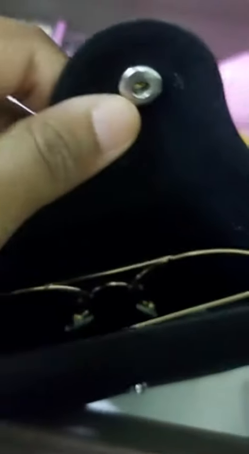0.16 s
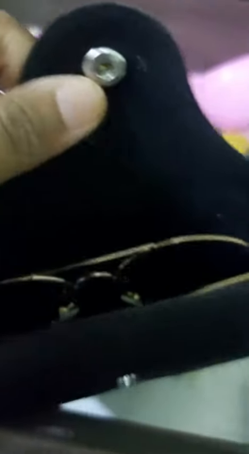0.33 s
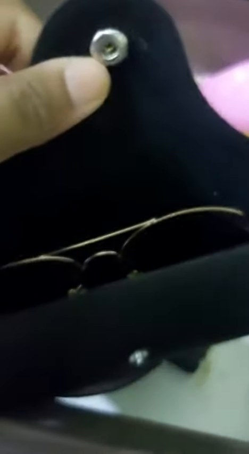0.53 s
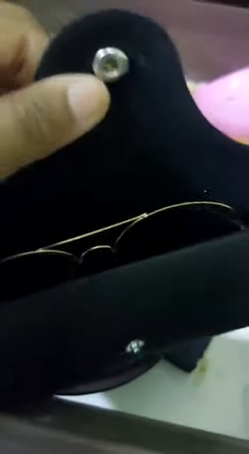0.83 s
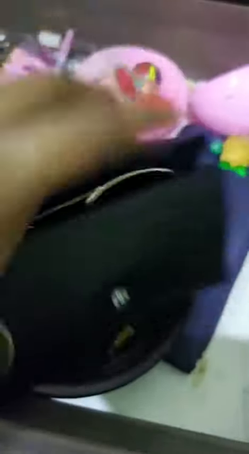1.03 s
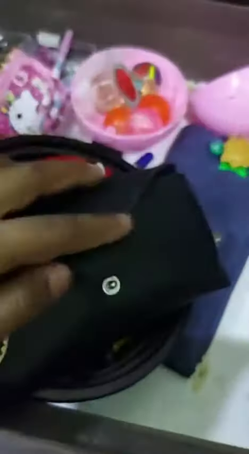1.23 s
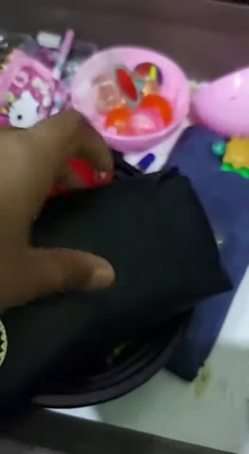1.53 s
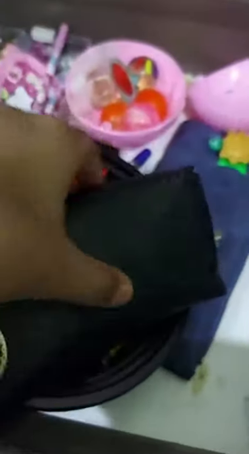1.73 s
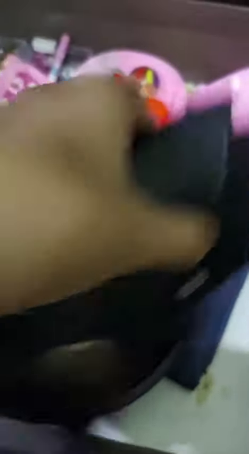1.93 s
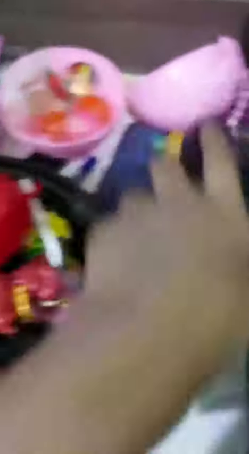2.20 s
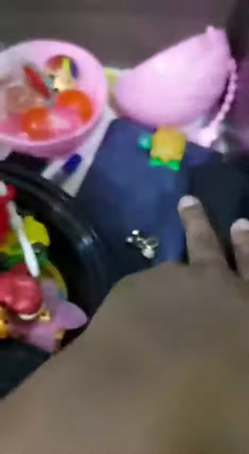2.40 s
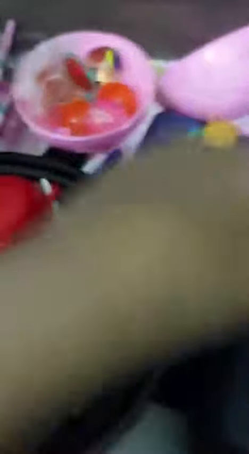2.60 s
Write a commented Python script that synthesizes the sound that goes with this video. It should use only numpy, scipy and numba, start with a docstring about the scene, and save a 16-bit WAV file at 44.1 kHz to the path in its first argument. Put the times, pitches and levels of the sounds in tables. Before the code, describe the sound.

Near-silent low hum first, then a glasses case closes with a sharp metal tick and rustle, a few soft taps follow, and it lands hard on a shelf; close phone microphone, small room, short echo.

```python
"""A hard glasses case is folded shut by hand and set down on a shelf, close to a phone in a small room.
Blows set decaying modes ringing: the hollow shell knocks, the shelf thuds, the metal frames and snap tick.
Fingers rub the cloth cover, made of dense noise grains, and a far machine hums as a few wavering sines.
Shaped noise gives the rumble and hiss; delay lines that feed each other give the echo of the room."""
import sys
import numpy as np
from scipy import signal
from scipy.fft import rfft, irfft
from scipy.io import wavfile
from scipy.ndimage import uniform_filter1d, map_coordinates
from numba import njit

SR = 44100
rng = np.random.default_rng(int(sys.argv[2]) if len(sys.argv) > 2 else 0)


def master(y):
    """Save y as 16-bit WAV."""
    cut = np.clip(np.atleast_2d(y).T, -1, 1)
    pcm = np.round(cut * 32767)  # scale
    wavfile.write(sys.argv[1], SR, pcm.astype(np.int16))


def decibels_to_gain(level_db):
    """Convert a level in decibels to a linear amplitude gain (20 dB per decade)."""
    exponent = np.asarray(level_db, float) / 20
    return 10 ** exponent


N = 121275  # length in samples


def level(x, db):
    """Scale to an rms level in dB."""
    return x * decibels_to_gain(db) / np.sqrt(np.mean(x ** 2))


def band(x, hz, octaves):
    """Band-pass around hz, so many octaves wide."""
    low = hz * 2 ** (-octaves / 2)
    high = min(hz * 2 ** (octaves / 2), .45 * SR)
    return signal.sosfilt(signal.butter(2, [low, high], "bandpass", fs=SR, output="sos"), x)


def walk(rate):
    """Smooth random wander around zero, with about rate new values a second."""
    k = int(SR / rate)
    steps = np.repeat(rng.standard_normal(N // k + 1), k)
    return 0.56 * uniform_filter1d(uniform_filter1d(steps, k), k)[:N]


def shape(table, hz):
    """Read a spectrum table in dB at hz, along a logarithmic pitch scale."""
    table = np.array(table)
    return np.interp(np.log(hz), np.log(table[:, 0]), table[:, 1])


def sides(left_over_right_db):
    """Gains that make the left side louder than the right by so many dB."""
    return decibels_to_gain(np.array([[left_over_right_db], [-left_over_right_db]]) / 2)


# The steady tones of the far machine.
# Each row: pitch in Hz, level in dB, how strongly that level wavers in dB.
HUM_LINES = [(48, -52.5, 4.5), (42.2, -65.5, -11), (94.9, -56, -4.5), (128, -61.5, 1.5)]
# How the higher hum tones swell and fade.
# Each row: time in seconds, change of level in dB.
OVERTONE_SWELL_CURVE = [(0, -14), (.4, -3), (.9, 1), (2.2, 1.5), (2.75, -8)]


def machine_hum():
    """A few sine tones, each wavering in level and slightly in phase, the same left and right."""
    t = np.arange(N) / SR
    swell_db = np.interp(t, *np.array(OVERTONE_SWELL_CURVE).T)
    hum = np.zeros(N)
    for hz, db, waver_db in HUM_LINES:
        line_db = db + waver_db * walk(11) + (hz > 90) * swell_db
        turns = hz * t + .03 * walk(3.9) + rng.random()
        hum += decibels_to_gain(line_db) * np.sqrt(2) * np.sin(2 * np.pi * turns)
    return hum


# The colour of the rumble and microphone hiss.
# Each row: pitch in Hz, relative strength there in dB per Hz.
AIR_SPECTRUM = [(30, -22), (50, -17.5), (70, -28), (90, -5.5), (190, -16.5), (250, -11), (330, -14.5),
                (420, -18.5), (500, -24), (1000, -37.5), (2040, -49), (4000, -59.5), (16500, -72)]


def room_air():
    """Noise shaped into rumble and microphone hiss; the bass is nearly the same left and right."""
    air_db, flicker_db, alike_hz = -53, 0.25, 460  # left and right part ways around alike_hz
    hz = np.maximum(np.fft.rfftfreq(N, 1 / SR), 1)
    colour = decibels_to_gain(shape(AIR_SPECTRUM, hz))
    mid, side = rng.standard_normal((2, N))
    mid = irfft(rfft(mid) * colour, N)
    side = irfft(rfft(side) * colour * np.sqrt(hz / (hz + alike_hz)), N)
    air = (mid + side * np.array([[1], [-1]])) * decibels_to_gain(flicker_db * walk(1.7))
    return level(air, air_db)


# An even treble hiss that grows as the hand moves about.
# Each row: time in seconds, rms level in dB.
HISS_CURVE = [(0, -77.5), (.8, -78.5), (1.0, -70.5), (1.3, -73.5), (1.45, -74), (1.7, -70), (2.101, -73),
              (2.3, -65.5), (2.5, -70.5), (2.75, -66.5)]


def treble_hiss():
    """Smooth band of treble noise, unrelated left and right, following the level curve."""
    noise = band(rng.standard_normal((2, N)), hz=13000, octaves=0.98)
    db = np.interp(np.arange(N) / SR, *np.array(HISS_CURVE).T)
    return level(noise, 0) * decibels_to_gain(db)


# How the fingers move on the cloth.
# Each row: time in seconds, level in dB, treble tilt in dB per octave around 2000 Hz.
RUB_MOVES = [(0, -100, -8), (.85, -95, -7), (.97, -68.5, -4.5), (1.02, -71, -4), (1.11, -63, -6),
             (1.16, -49.5, -5), (1.27, -58, -4), (1.4, -75, -4), (1.5, -61.5, 0), (1.54, -64, -3),
             (1.66, -66, -5), (1.761, -63.5, -5.5), (1.83, -52.5, -3.5), (1.94, -55, -5.5), (2.0, -67, 3),
             (2.12, -74.5, -7.5), (2.221, -63, -3), (2.3, -29, -3), (2.398, -49, -6), (2.5, -63.5, -1.5),
             (2.598, -66, 5), (2.75, -92, 18)]
# The colour of the cloth.
# Each row: pitch in Hz, strength of the grains there in dB.
CLOTH_SPECTRUM = [(400, -4), (800, -2.5), (1700, -2.5), (3400, -4), (6000, -11), (10000, -19.5),
                  (14000, -49), (16500, -33)]


def cloth_rub():
    """Dense fibre grains; the rubbing hand sets level and brightness."""
    grains_per_s, scatter_db, alike = 4900, 3, 0.2  # alike: share of the left grains heard on the right
    t = np.arange(N) / SR
    time, rub_db, rub_tilt_db = np.array(RUB_MOVES).T
    db, tilt_db = np.interp(t, time, rub_db), np.interp(t, time, rub_tilt_db)
    on = rng.random((2, N)) < grains_per_s / SR
    scatter = decibels_to_gain(scatter_db * np.minimum(rng.exponential(size=(2, N)), 5))  # a few grains are much louder
    grains = on * rng.standard_normal((2, N)) * scatter
    grains = grains + 0.45 * rng.standard_normal((2, N))  # soft noise between the grains
    left, right = grains * decibels_to_gain(4.6 * walk(39.33))
    grains = np.array([left, alike * left + np.sqrt(1 - alike ** 2) * right])
    centres = 450 * 2 ** np.arange(0, 5.4, .5)
    parts = [decibels_to_gain(shape(CLOTH_SPECTRUM, hz)) * band(grains, hz, 1) for hz in centres]
    norm = np.sqrt(np.mean(sum(parts) ** 2))
    out = np.zeros((2, N))
    for hz, part in zip(centres, parts):
        out += decibels_to_gain(tilt_db * np.log2(hz / 2000) + 3 * walk(25)) * part
    return out / norm * decibels_to_gain(db) * sides(4)


def ring(x, hz, t60):
    """One mode that dies by 60 dB in t60 seconds, peaking near 1 for a unit blow."""
    r = np.exp(-np.log(1000) / (t60 * SR))
    w = 2 * np.pi * hz / SR
    return signal.lfilter([0, np.sin(w)], [1, -2 * r * np.cos(w), r * r], x)


def blows(events, modes, reach_octaves, loose, crack_db, crunch_db):
    """A first contact and a dying rattle of further contacts, some of them harder when the object is
    loose; each blow wakes the modes near its centre."""
    rattle_per_s, crack_s, crack_hz = 1600, .005, 7000
    size = SR // 4
    out = np.zeros((2, N + SR))
    t = np.arange(size) / SR
    for start, db, hz, rattle_s, pan_db in events:
        chance, noise = rng.random((2, size)), rng.standard_normal((2, size))
        fade = np.exp(-t / max(rattle_s, 1e-4))
        push = (chance[0] < rattle_per_s / SR) * (2 * chance[1] - 1) * loose * fade
        push[0] = -1  # first contact
        body = np.zeros(size)
        for k, (mode_hz, mode_db, t60) in enumerate(modes):
            woken_db = mode_db - 11.3 * (np.log2(mode_hz / hz) / reach_octaves) ** 2
            body += (-1) ** k * decibels_to_gain(woken_db) * ring(push, mode_hz, t60)
        crack = band(noise[0], crack_hz, 3.3) * np.exp(-t / (crack_s + rattle_s))
        crunch = band(noise[1] * fade, 0.81 * hz, 3.98)
        solid = body / np.abs(body).max() + decibels_to_gain(crunch_db) * crunch / np.abs(crunch).max()
        # the crack leans to one side only half as much as the rest
        blow = sides(pan_db) * solid + decibels_to_gain(crack_db) * sides(pan_db / 2) * crack
        i = int(start * SR)
        out[:, i:i + size] += decibels_to_gain(db) * blow
    return out[:, :N]


# Ticks of the frames and the snap. Each row: start in seconds, level in dB, centre in Hz of the
# modes it wakes, rattle length in seconds, left over right in dB.
TICK_EVENTS = [(1.132, -32, 7000, .01, 4), (1.152, -27.5, 4220, .004, 8), (1.171, -34.5, 6000, .003, 6),
               (1.2, -17.5, 4490, .004, 12), (1.201, -29, 6000, 0.0027, 9), (1.208, -33, 3030, 0.0074, 0),
               (1.561, -50, 2260, 0.0037, 20.5), (1.565, -51, 4400, .002, 20.5),
               (1.623, -50, 3000, .002, 4), (1.639, -30, 4100, .001, 3.5), (1.877, -46.5, 4000, .003, 18),
               (1.891, -44.5, 5000, .004, -15.5), (1.919, -37.5, 5000, .0012, 14),
               (1.927, -43, 3600, .004, -18.5), (2.263, -35, 4160, .004, -15),
               (2.272, -46.5, 3070, .01, -4), (2.294, -27, 3800, .004, 2), (2.303, -33.5, 3020, .003, 3),
               (2.321, -23.5, 3440, .003, 11), (2.342, -38.5, 3500, .004, 3.5),
               (2.393, -41.5, 6000, .003, -5.5), (2.445, -39.5, 4395, .004, 15.5),
               (2.596, -55, 4100, .004, 13)]
# How the metal rings. Each row: pitch in Hz, strength in dB, time in seconds to die by 60 dB.
METAL_MODES = [(1900, -8, .008), (2500, -4, .008), (3230, -20, .09), (3400, -20, .08), (3620, -21, .07),
               (3700, -1, .008), (4730, -4, .004), (5700, 0, .006), (6900, -5, .006), (8500, -8, .007),
               (10000, -11, .005), (12500, -13, .005)]


def metal_ticks():
    """Small hard contacts that wake a narrow group of metal modes and rattle strongly."""
    return blows(TICK_EVENTS, METAL_MODES, reach_octaves=0.55, loose=4.2, crack_db=-12, crunch_db=-8)


# Knocks on the shell. Each row: start in seconds, level in dB, centre in Hz of the modes it wakes,
# rattle length in seconds, left over right in dB.
KNOCK_EVENTS = [(1.134, -26, 1190, 0.0097, 9), (1.181, -35, 1220, 0.0023, 9),
                (1.318, -43.5, 1400, 0.0025, 13.5), (1.484, -47.5, 1190, 0.019, 12),
                (1.503, -43, 1130, 0.0015, 12), (1.575, -51.5, 990, 0.014, 14),
                (1.639, -31, 900, 0.0006, 25.5), (1.787, -34, 970, 0.0043, 7),
                (1.7915, -21.5, 1360, 0.0029, 7.5), (1.809, -41, 1500, 0.006, 7),
                (2.054, -51.5, 1110, 0.00053, 2), (2.182, -38, 1480, 0.0087, 8.5),
                (2.249, -29.5, 814, 0.00022, 13.5), (2.285, -10, 607, 0.00013, 10.5),
                (2.289, -15, 890, 0.0085, 18.5), (2.357, -20, 1080, 0.00092, 12.5)]
# How the hollow shell rings. Each row: pitch in Hz, strength in dB, time in seconds to die by 60 dB.
SHELL_MODES = [(600, -6, .045), (762, 0, .048), (1155, -4, .035), (1530, -4, .016), (1900, -4, .028),
               (2450, -6, .016), (3080, -7, .012), (4430, -8, .009)]


def shell_knocks():
    """Blows on the hollow shell, with crunching noise that peaks as high as the ringing."""
    return blows(KNOCK_EVENTS, SHELL_MODES, reach_octaves=1.1, loose=0.75, crack_db=-19, crunch_db=0)


# The case lands or leans on the shelf. Each row: start in seconds, level in dB, centre in Hz of the
# modes it wakes, rattle length in seconds, left over right in dB.
THUD_EVENTS = [(1.137, -43.5, 298, 0.0035, 8), (1.165, -36, 100, 0.0015, -2),
               (1.792, -32.5, 430, 0.00086, 9.5), (1.812, -37.5, 148, 0.0022, 6),
               (2.249, -36.5, 303, 0.00092, 9), (2.285, -7.5, 330, 0.0022, 9),
               (2.321, -19, 327, 0.0047, -6)]
# How the shelf rings. Each row: pitch in Hz, strength in dB, time in seconds to die by 60 dB.
SHELF_MODES = [(78, -12, .25), (100, -13, .22), (130, -14, .22), (170, -11, .15), (215, -10, .06),
               (270, -10, .08), (322, -7, .11), (345, -9, .13), (423, 0, .095), (550, -8, .05),
               (680, -5, .05)]


def shelf_thuds():
    """Blows that wake a wide spread of low shelf modes, with hardly any crack."""
    return blows(THUD_EVENTS, SHELF_MODES, reach_octaves=1.57, loose=0.75, crack_db=-39.5, crunch_db=-10.5)


# A jolt of the wire frame. Each row: start in seconds, level in dB, centre in Hz of the modes it
# wakes, rattle length in seconds, left over right in dB.
JOLT_EVENTS = [(1.203, -38, 3400, 0.034, -2)]
# How the wire rings. Each row: pitch in Hz, strength in dB, time in seconds to die by 60 dB.
WIRE_MODES = [(3240, -2, .13), (3430, 3, .11), (3600, -8, .1)]


def wire_singing():
    """The wire frame sings on after a jolt, in a few slowly dying modes."""
    return blows(JOLT_EVENTS, WIRE_MODES, reach_octaves=2, loose=1, crack_db=-40, crunch_db=-22)


@njit
def walls(x, lags, gain, damp):
    """Eight delay lines that feed each other, duller on every round."""
    line, soft, out = np.zeros((8, 4096)), np.zeros(8), np.zeros((2, len(x)))
    for i in range(len(x)):
        total = 0.
        for k in range(8):
            soft[k] += (1 - damp) * (gain[k] * line[k, (i - lags[k]) & 4095] - soft[k])
            total += soft[k]
            out[k % 2, i] += soft[k] * (1 - (k & 2))
        for k in range(8):
            line[k, i & 4095] = x[i] + soft[k] - total / 4
    return out


def room_echo(near):
    """Echo of the small room: each round trip loses level, and more of it in the treble."""
    echo_db, t60_s, damp = -16, 0.31, 0.349  # t60_s: time to die by 60 dB, before damping
    lags = np.array([311, 443, 587, 739, 919, 1123, 1361, 1607])  # samples
    gain = decibels_to_gain(-60 * lags / SR / t60_s)
    return decibels_to_gain(echo_db) * walls(near.mean(axis=0), lags, gain, damp)


def two_ports(near, echo):
    """The right port hears the case slightly later; long waves reach both ports alike."""
    lag_s, pan_above_hz = 0.000095, 70
    late = map_coordinates(near[1], [np.arange(N) - lag_s * SR], order=3)
    heard = np.array([near[0], late]) + echo
    mid = heard.mean(axis=0)
    high_pass = signal.butter(1, pan_above_hz, "high", fs=SR, output="sos")
    side = signal.sosfilt(high_pass, heard[0] - mid)
    return np.array([mid + side, mid - side])


def scene():
    """Case, frames and cloth near the left port, their echo, and the steady sounds behind them."""
    background = machine_hum() + room_air() + treble_hiss()
    near = cloth_rub() + metal_ticks() + shell_knocks() + shelf_thuds() + wire_singing()
    return two_ports(near, room_echo(near)) + background


def low_pass(x):
    """Removes everything above the highest recorded frequency."""
    return signal.sosfilt(signal.butter(12, 16650, fs=SR, output="sos"), x)


def record(dry):
    """The microphone cuts the deepest bass and the top and rounds the loudest peaks."""
    low_hz, top_hz, ceiling = 36, 15900, .95
    wet = signal.sosfilt(signal.butter(4, low_hz, "high", fs=SR, output="sos"), dry)
    rounded = wet / (1 + (wet / ceiling) ** 4) ** (1 / 4)
    mix = signal.sosfilt(signal.butter(8, top_hz, fs=SR, output="sos"), rounded)
    return low_pass(mix)


dry = scene()
out = record(dry)
master(out)
```